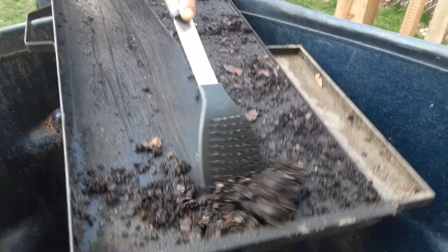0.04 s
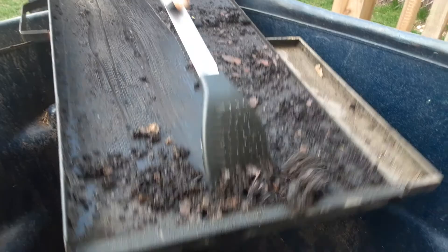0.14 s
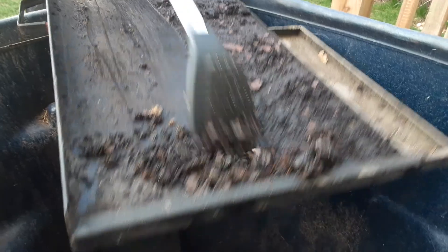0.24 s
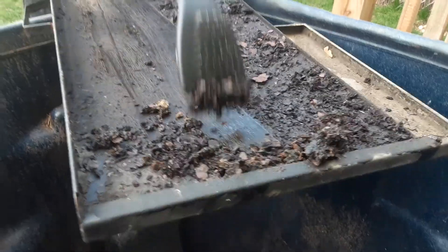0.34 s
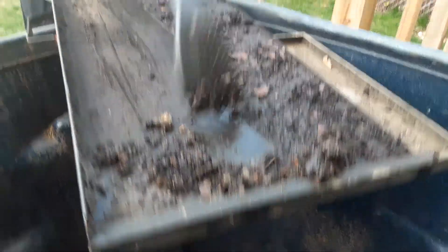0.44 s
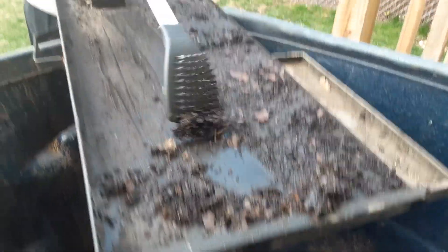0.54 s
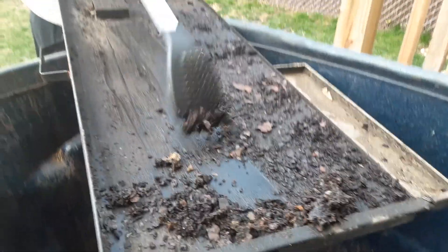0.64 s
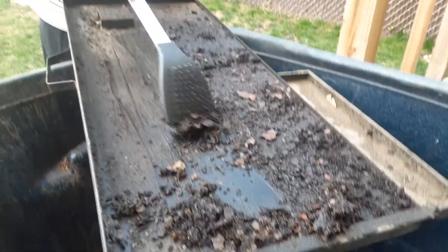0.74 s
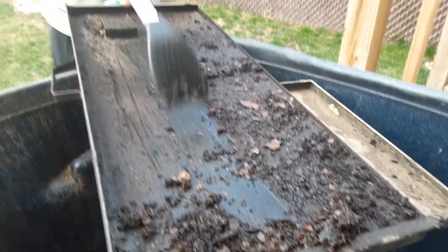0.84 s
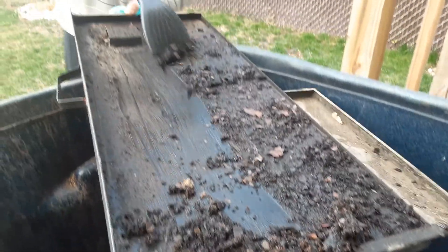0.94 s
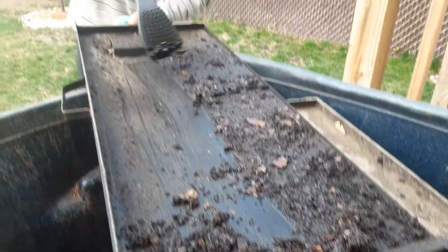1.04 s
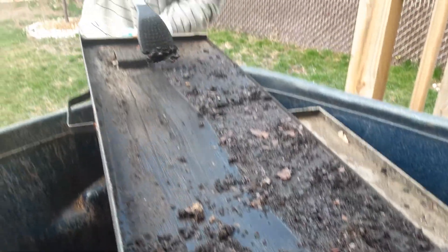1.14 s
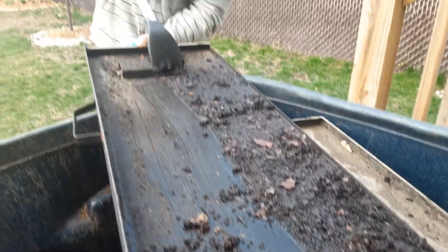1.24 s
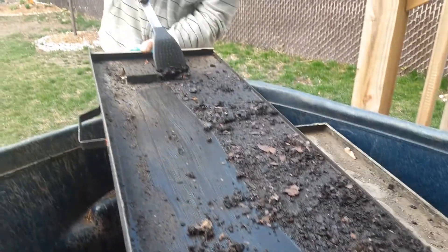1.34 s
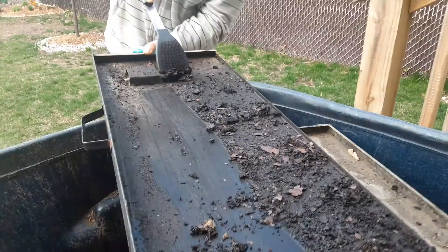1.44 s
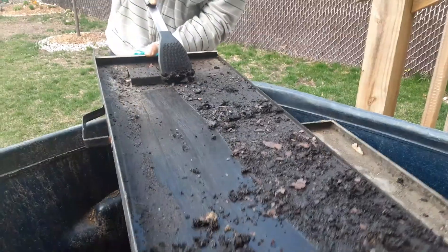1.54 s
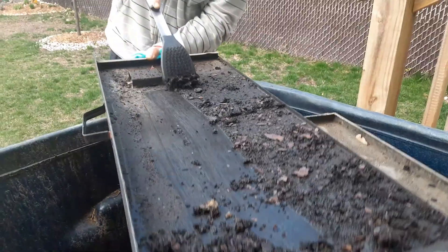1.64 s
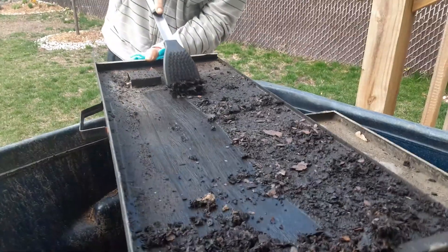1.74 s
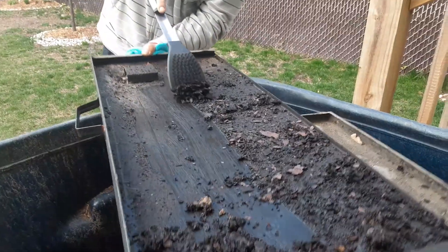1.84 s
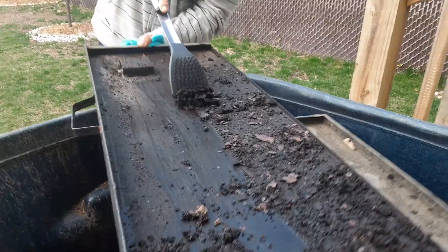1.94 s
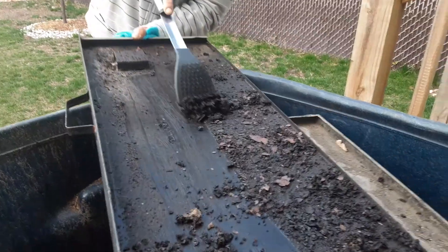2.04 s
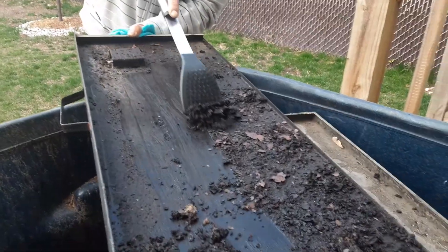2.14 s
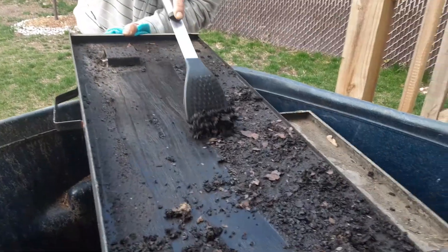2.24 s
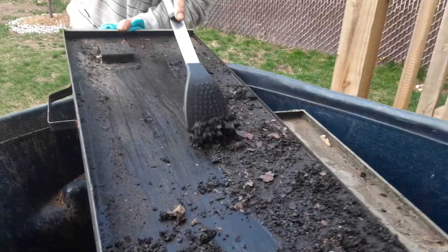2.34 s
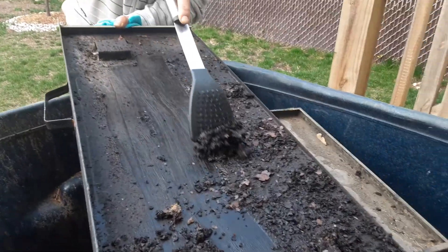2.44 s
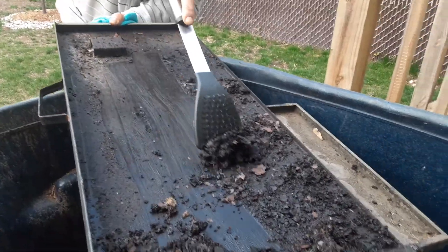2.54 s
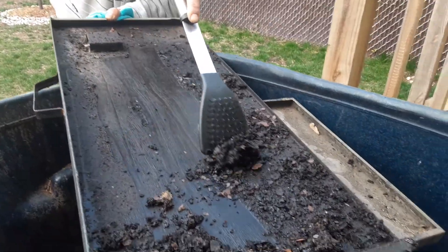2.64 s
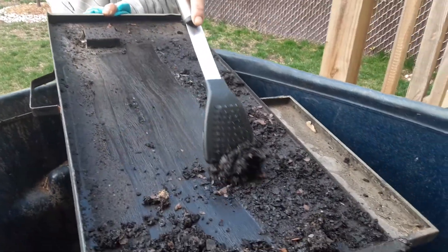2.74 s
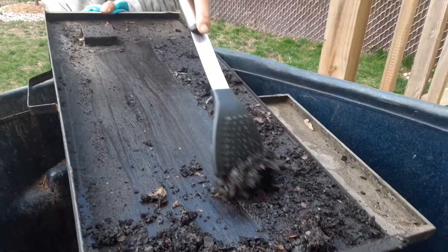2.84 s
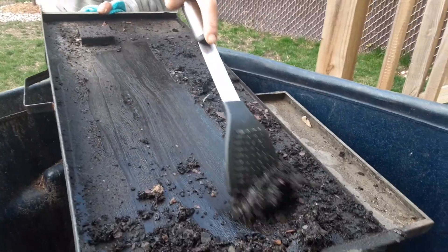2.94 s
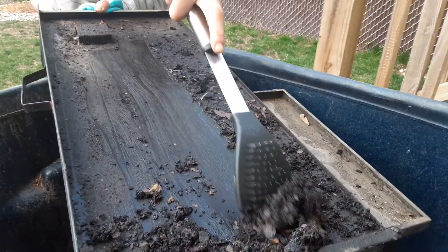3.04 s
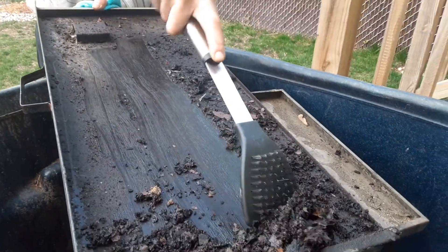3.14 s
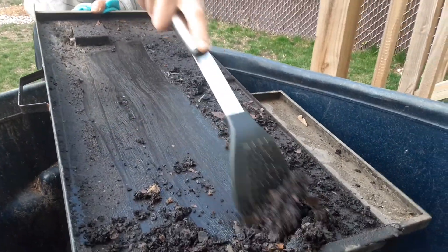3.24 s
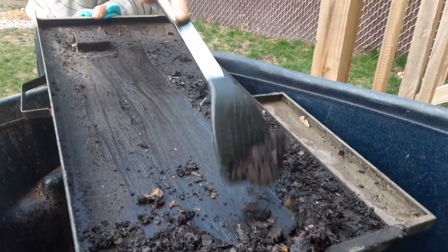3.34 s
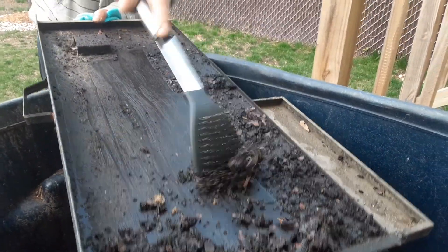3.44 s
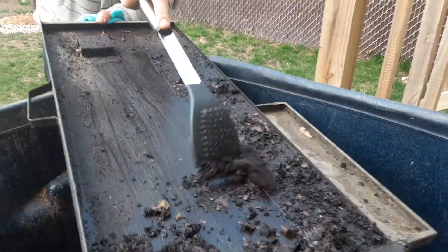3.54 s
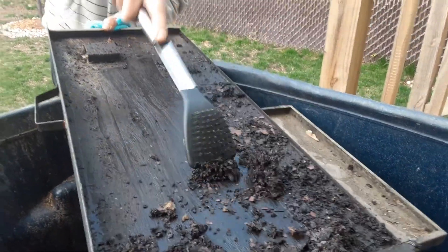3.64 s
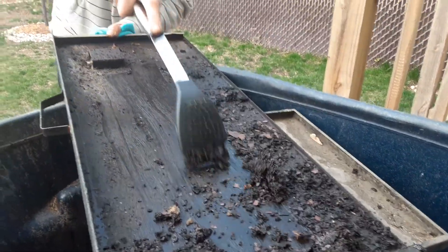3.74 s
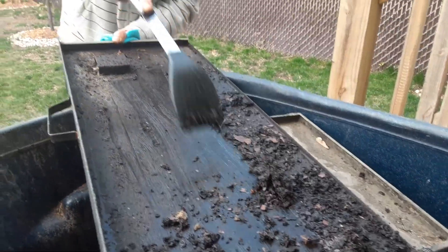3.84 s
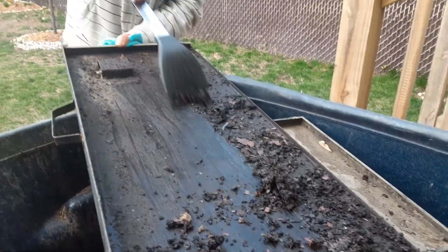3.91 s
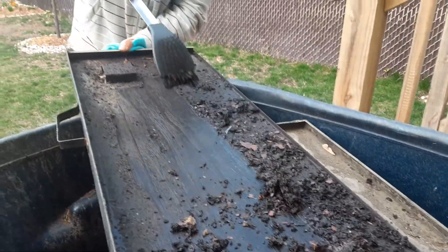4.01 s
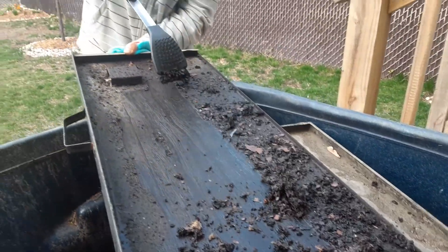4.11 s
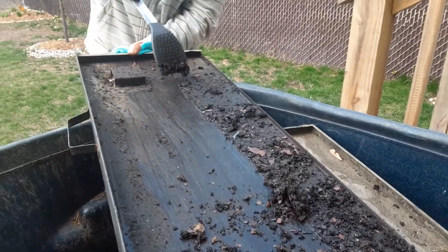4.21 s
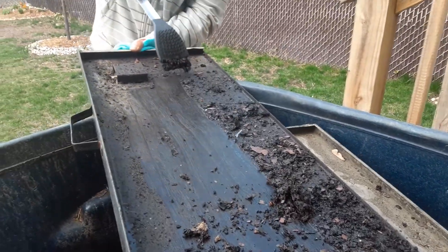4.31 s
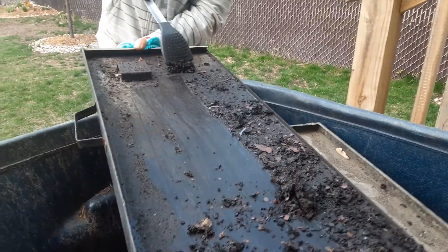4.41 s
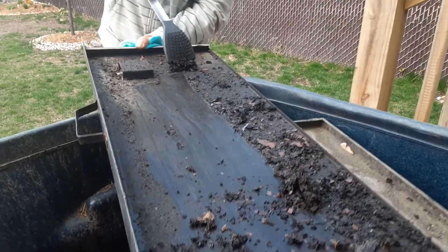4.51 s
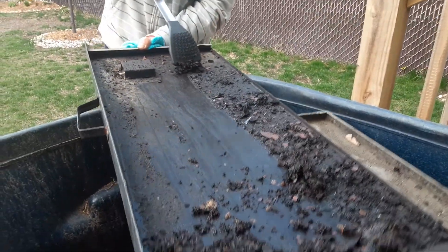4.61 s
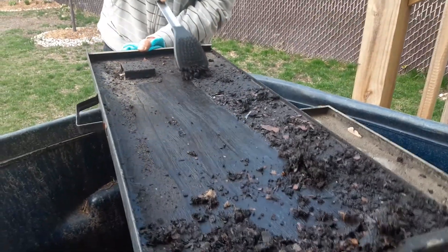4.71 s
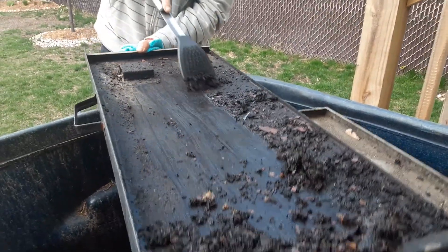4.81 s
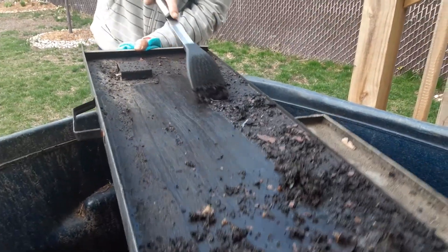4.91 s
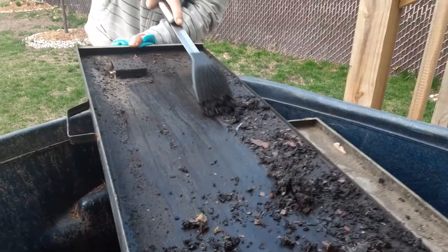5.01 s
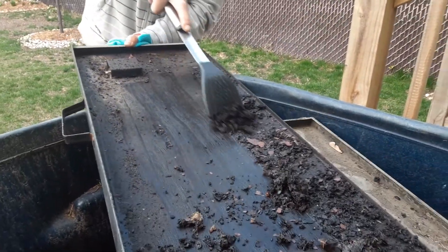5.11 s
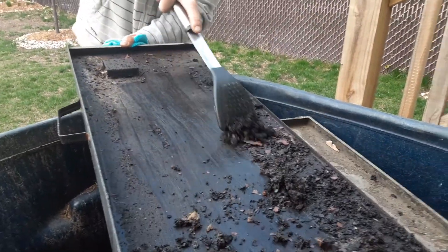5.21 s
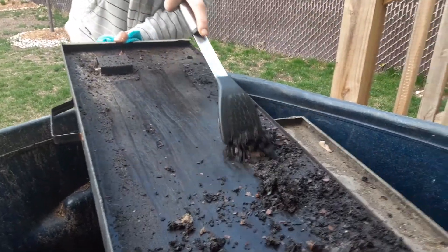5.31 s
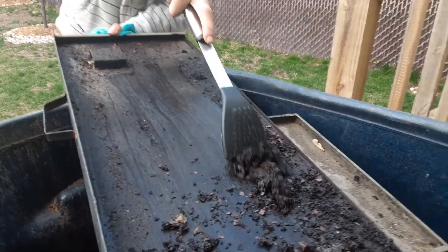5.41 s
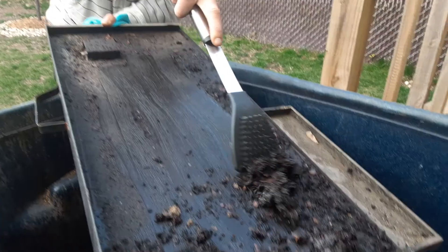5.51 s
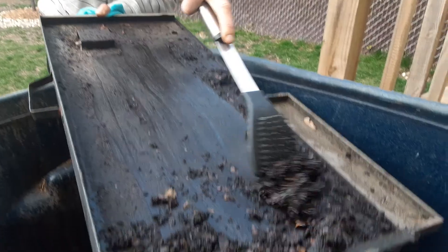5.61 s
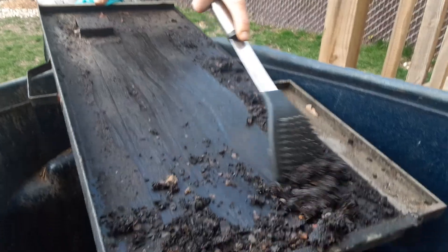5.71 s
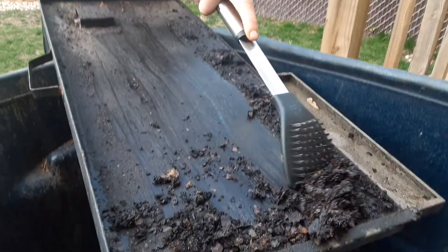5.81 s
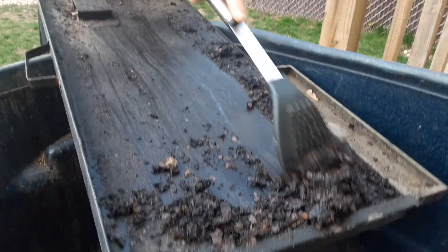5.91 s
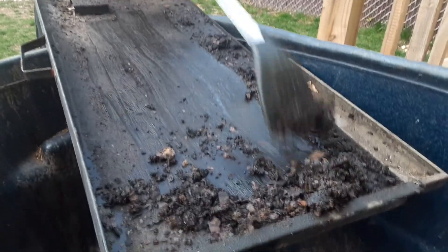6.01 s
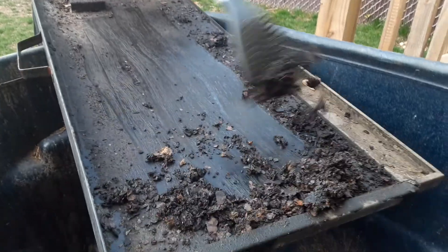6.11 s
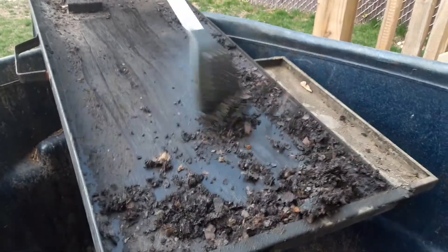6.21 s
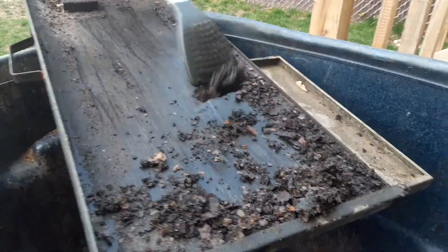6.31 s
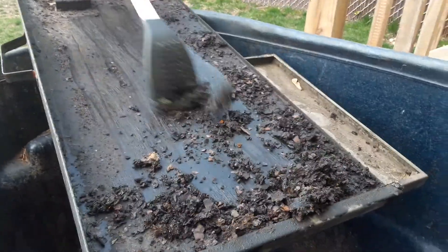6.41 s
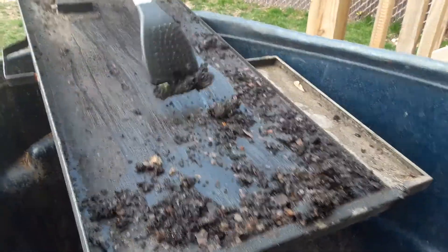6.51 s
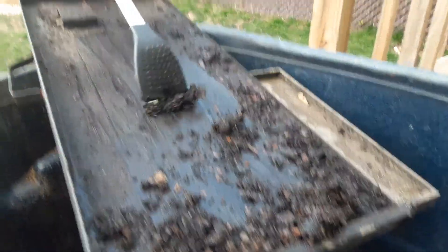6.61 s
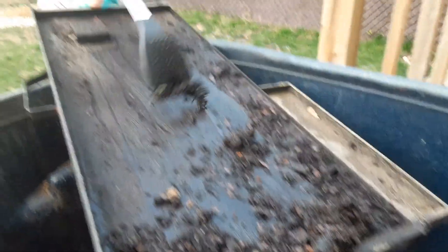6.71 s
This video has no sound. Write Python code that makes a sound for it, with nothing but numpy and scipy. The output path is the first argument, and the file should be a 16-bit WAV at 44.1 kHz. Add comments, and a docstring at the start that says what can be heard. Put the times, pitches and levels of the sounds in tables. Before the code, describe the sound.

A blade ploughs dry, crumbly grit along a resonant metal tray resting on a plastic bin. Short scrape, a pair of banging knocks, faint taps; long rasp with singing sheet notes, a heavy knock and a lighter one; another long, crunchier rasp with bright clicks; finally five quick hollow bangs with crumbs jumping. Quiet open air behind, very close microphone, muffled bin thud on the left, crisp grit on the right.

```python
"""Outdoors, over a steady hush of filtered noise, a scraper ploughs dry grease crumbs down a sheet-steel tray lying
across a plastic bin: granular noise through the tray's resonances, with sung tones and sharp ticks.
After this first short stroke come knocks on the tray (decaying noise, mode tones and a short push) and low puffs
on the right; then a long stroke, more knocks, another long stroke and a last run of knocks.
One hears it from two ports at the tray's end: left covered (dull, rich in bin thud), right open (bright, thin)."""
import sys
import numpy as np
from scipy import signal
from scipy.fft import rfft, irfft, next_fast_len
from scipy.io import wavfile
from scipy.ndimage import uniform_filter1d, map_coordinates

SR = 44100
rng = np.random.default_rng(int(sys.argv[2]) if len(sys.argv) > 2 else 0)


def transcribe(u):
    """Save the signal u as a 16-bit wav file named by the first command-line argument.

    u: samples, shape (n,) or (channels, n), limited to [-1, 1]; the rate is SR.
    q: integer samples, one column per channel.
    """
    v = np.clip(np.atleast_2d(u).T, -1, 1)
    q = np.round(v * 32767).astype(np.int16)
    wavfile.write(sys.argv[1], SR, q)


N = 298116

# Blade on tray, one curve a stroke:
# (time [s], pressure as tray rumble level [dB], speed as crumb crunch level [dB], bin thud level [dB])
STROKES = [
    [(0.0, -30.5, -39, -32), (0.02, -34, -42.5, -39), (0.048, -32.5, -39, -34), (0.142, -29.5, -41.5, -36),
     (0.168, -35, -50.5, -43), (0.192, -36.5, -42.5, -53), (0.23, -47, -51.5, -46)],
    [(1.47, -63, -77, -65), (1.52, -45.5, -51, -61), (1.64, -34, -36, -48), (1.66, -32, -37, -68),
     (1.676, -34, -36, -43.5), (2.37, -32.5, -37.5, -42), (2.572, -30, -36, -50), (2.682, -20, -32, -39),
     (2.796, -22.5, -35.5, -45), (2.858, -26.5, -38.5, -33), (2.92, -32, -39, -46),
     (3.008, -35, -36.5, -44), (3.034, -37, -39, -67), (3.07, -35, -40.5, -48),
     (3.142, -25.5, -37.5, -43.5), (3.288, -39.5, -56.5, -44), (3.33, -62, -73, -52)],
    [(4.53, -57, -66, -53), (4.568, -47, -53.5, -65), (4.6, -35, -42.5, -48), (4.718, -37.5, -37, -45),
     (4.878, -34.5, -36, -45), (4.928, -33.5, -37.5, -36), (4.972, -32, -38.5, -39.5),
     (5.074, -37, -32, -36), (5.284, -31, -35.5, -46), (5.328, -34, -35, -42.5), (5.486, -32, -33.5, -46),
     (5.518, -21, -27, -46), (5.582, -27.5, -31, -45), (5.834, -35.5, -42.5, -52), (5.862, -36, -48, -68),
     (5.898, -45.5, -60, -45), (5.95, -60, -63, -71)],
]
# Tray shifting between strokes and knocks:
# (time [s], tray rumble level [dB], crumb trickle level [dB], bin thud level [dB])
SETTLING = [
    [(0.24, -47, -54, -50), (0.248, -58, -66, -50), (0.27, -43, -47, -54), (0.332, -54, -57, -50),
     (0.384, -48, -55.5, -45), (0.43, -58, -66.5, -57), (0.48, -49, -50, -45)],
    [(3.72, -33, -51, -33), (3.77, -45, -49, -48), (3.826, -47.5, -62, -40), (3.864, -48.5, -61.5, -40),
     (3.966, -54.5, -62, -52), (4.012, -56, -61, -45), (4.1, -68, -72, -71)],
    [(5.95, -57, -76, -72), (6.074, -59, -69, -70), (6.08, -53.5, -65, -71), (6.142, -53, -59, -71),
     (6.158, -57, -59, -57), (6.168, -58, -71, -59), (6.18, -54, -60, -52)],
    [(0.82, -42, -70, -39), (0.886, -48, -49, -43), (0.91, -46, -59.5, -44), (1.0, -53.5, -60, -42)],
    [(1.1, -51, -57, -41), (1.162, -62, -63, -61), (1.18, -57, -62.5, -48), (1.28, -62, -61.5, -62)],
    [(1.37, -52, -59, -50), (1.392, -54, -61, -50), (1.404, -51, -61, -49), (1.47, -68, -78, -57)],
    [(3.33, -58, -66, -58), (3.338, -55, -69, -46), (3.388, -53, -58, -47), (3.46, -50, -56, -47)],
    [(4.25, -68, -78, -70), (4.316, -70, -64, -71), (4.334, -74, -61.5, -60), (4.4, -68, -68, -69)],
    [(4.47, -56, -63.5, -54), (4.516, -57, -62, -55), (4.52, -68, -67, -49), (4.53, -58, -65, -55)],
]
# Stick-slip notes of the sheet: (time [s], length [s], frequency [Hz], level [dB])
SUNG_NOTES = [(0.115, 0.053, 227.3, -30), (2.504, 0.072, 222, -30.5), (2.662, 0.061, 490, -26),
              (2.715, 0.17, 545, -27), (2.79, 0.075, 482, -27.5), (3.096, 0.1, 770, -35.5),
              (3.134, 0.038, 222, -34.5), (3.202, 0.019, 222, -31.5), (4.959, 0.064, 317.4, -36),
              (5.028, 0.024, 202, -36), (5.463, 0.044, 657, -35), (5.506, .11, 500, -34),
              (5.784, 0.037, 480, -36)]
# Single sharp contacts of blade and hard crumbs: (time [s], level [dB])
TICKS = [(0.1755, -49), (0.195, -47), (0.369, -45), (0.458, -46), (0.4713, -45.5), (0.61, -47),
         (0.6394, -43.5), (0.7117, -33), (0.8616, -48), (1.1, -50), (1.4825, -52), (2.507, -30),
         (2.9473, -27), (3.2664, -43.5), (3.685, -35), (3.7294, -48.5), (3.7894, -51.5), (3.9449, -63),
         (3.9932, -39.5), (4.2607, -58), (4.413, -48), (4.5555, -49.5), (4.5935, -42), (4.619, -29.5),
         (5.3593, -23), (5.651, -22), (5.494, -25.5), (5.7284, -32), (6.0804, -48), (6.3967, -36.5),
         (6.5837, -22.5)]
# Knocks: (time [s], tray level [dB], edge re tray [dB], crumbs re tray [dB], bin re tray [dB], rattle hold [s],
# tray decay by 60 dB [s], build-up of airborne sound at the open port [s], lean to the lower hollow note [dB])
KNOCKS = [(0.261, -44.5, 11, -9.5, -26, .018, .16, 0.016, -2),
          (0.5034, -16.5, -10, -7.5, -11, 0.012, 0.51, 0.0077, 9.5),
          (0.707, -18, -11.5, -11.5, -3, 0.0092, .42, 0.0089, 7),
          (1.018, -37.5, 3, -8, -3, 0.014, 0.27, 0.0085, 7),
          (1.295, -39, -12.5, -12, 1, 0.028, 0.29, 0.019, 5.5),
          (3.483, -12.5, -10, -13, -33, 0.032, 0.49, 0.023, 1.5),
          (3.683, -26, -9.5, -16.5, -2.5, .02, 0.39, 0.00077, 10),
          (4.416, -42, -7, -16.5, 0, 0.012, 0.27, 0.014, -1),
          (6.204, -14, -8, -10.5, -13, 0.035, 0.51, 0.015, -3),
          (6.287, -20.5, -25, -15, -23, 0.014, .26, 0.0022, -8),
          (6.398, -14.5, -9, -12.5, -8, 0.047, 0.45, 0.022, 1),
          (6.484, -26.5, -9, -18, -28, .03, .5, .001, -8),
          (6.584, -19, -7, -12, -8, 0.013, 0.4, 0.00073, -6)]
# Brief low puffs, strongest at the open port: (time [s], level [dB])
PUFFS = [(0.374, -31.5), (1.244, -49), (3.307, -37), (3.439, -50)]

# Resonances of the tray on the bin: (frequency [Hz], width [Hz], rise [dB])
TRAY_MODES = [(84.93, 57, 10.5), (148.4, 27, 12), (217.6, 43, 13.5), (309.4, 5.9, 13), (395, 14, 3),
              (458.6, 16, 9), (544, 5.7, 5.5), (584, 9.3, 1), (643, 65, 5.5), (730, 7.6, 7), (807, 18, 6.5),
              (918, 5.8, 8), (996, 19, 10.5), (1083, 13, 6), (1255, 55, 7), (1460, 13, 5), (1674, 15, 11.5)]

# Relative spectral densities, each scaled to its source's level: (frequency [Hz], density [dB])
AIR_COLOUR = [(18, -31), (30, -8), (157, -0.5), (394, -9), (499, -10), (616, -16), (844, -17.5),
              (2230, -31), (2750, -28.5), (9710, -47.5), (16000, -36)]
RUMBLE_COLOUR = [(150, -35.5), (250, -9), (404, -4.5), (477, -2.5), (581, -4), (771, -3.5), (1050, -6.5),
                 (1130, -7.5), (2600, -30.5), (3380, -54), (5720, -120)]
CRUNCH_COLOUR = [(880, -20.5), (1500, -4), (1770, -3.5), (2060, -9), (2970, -6), (3390, -8), (4990, -7),
                 (5990, -12), (6800, -15.5), (8840, -51.5), (15000, -120)]
DUST_COLOUR = [(4000, -30.5), (6800, -2), (7380, -3), (9620, -6.5), (11000, -1.5), (12400, -2.5),
               (15100, -7.5), (16000, -13)]
THUD_COLOUR = [(15, -64), (25, -43), (70, -5), (87, -3.5), (114, -8.5), (200, -15.5), (260, -14),
               (440, -120)]
GROAN_COLOUR = [(130, -31.5), (180, 3), (215, 14), (260, 4), (350, -33.5)]
SNAP_COLOUR = [(880, -20), (1500, 0.5), (2190, -11), (4200, -5), (6060, -4.5), (9650, -9.5), (12500, -3),
               (16000, -7.5)]
BANG_COLOUR = [(82, -27), (140, -13.5), (312, -3), (373, 1.5), (567, 4), (992, -8.5), (1140, -17.5),
               (1300, -15.5), (1690, -59), (2860, -120)]
EDGE_COLOUR = [(590, -12.5), (1000, 3.5), (1380, 2), (1580, 3), (2090, -5.5), (3600, -8.5), (4000, -11),
               (5200, -37), (8800, -120)]
JUMP_COLOUR = [(1290, -3), (2200, -6), (2680, -6.5), (2930, -1.5), (4820, -4.5), (5240, -3), (6800, -18),
               (8840, -26.5), (15000, -120)]
RING_COLOUR = [(60, -9), (90, -3), (150, -11.5), (230, -3), (320, 2), (500, -2), (800, -11.5),
               (1300, -22.5), (2000, -22.5)]
BOOM_COLOUR = [(15, -44), (25, -59), (38, -51), (70, 20.5), (162, 9), (200, -0.5), (260, 0), (440, -120)]
BLOW_COLOUR = [(60, -40), (150, -14), (350, -2), (700, 0), (1500, -6), (3000, -14), (8000, -30),
               (16000, -40)]
PUFF_COLOUR = [(100, -39), (220, -1), (350, 8), (520, -9), (900, -40)]

# Left port over right port, for far air, rubbing and blows: (frequency [Hz], level difference [dB])
PORTS_AIR = [(60, 14.5), (110, 15.5), (200, 10.0), (380, 2.5), (700, 0.0), (1290, -0.5), (2380, -4.5),
             (4400, -10.5), (8120, -8.0), (15000, -3.5)]
PORTS = [(60, 12.5), (190, 7), (460, 1), (1100, 4.5), (2620, -5.5), (4690, -19.5), (8390, -31),
         (11200, -15), (15000, -21)]
PORTS_BLOW = [(60, 10.5), (190, 15.5), (460, 1), (1100, 5), (2620, -5), (4690, -15.5), (8390, -30),
              (11200, -13.5), (15000, -16)]
# Left-right likeness, for rubbing and blows: (frequency [Hz], correlation [0 to 1])
ALIKE = [(60, 0.31), (160, 0.69), (300, 0.81), (500, 1), (1000, 0.86), (1500, 0.083), (4000, 0.033)]
ALIKE_BLOW = [(60, 0.44), (200, 0.77), (500, 1), (1000, 0.85), (1500, 0.23), (4000, 0.042)]

AIR_DB = -52.5
LEFT_LAG_S = 0.000046
TOP_HZ = 15750
FADE_S = 0.045  # contact comes and goes this fast
USUAL_PRESSURE_DB, USUAL_SPEED_DB = -34, -38  # a usual stroke, as rumble and crunch levels
DUST_DB, DUST_FOLLOWS = -3, 1.024  # re crunch at usual speed; dB for each dB of crunch
DUST_CHOKES = 0.16  # dB lost for each dB of pressure over the usual
GROAN_DB, GROAN_FOLLOWS = -45, 0.76  # at the usual pressure; dB for each dB of pressure
SING_EDGE_S, SING_WAVER_HZ = 0.0097, 7.92
TICK_T60_S, PUFF_T60_S, CRUMB_T60_S = 0.047, 0.053, 0.25  # decay by 60 dB
HOLLOW_DB = -10.5  # two deep bending notes of the sheet, re tray, before the lean


def amp(db):
    """Level: gain is ten to the power of decibels over twenty."""
    return 10 ** (np.asarray(db) / 20)


def unit(x):
    """Normalization: a signal divided by its rms has rms 1."""
    return x / np.sqrt(np.mean(x ** 2) + 1e-20)


def along(points, hz):
    """Logarithmic frequency: values are interpolated evenly along a log axis."""
    f, v = np.transpose(points)
    return np.interp(np.log(hz + 1), np.log(f + 1), v)


def wobble(rate):
    """Slow fluctuation: a smooth curve through random knots, rate knots a second."""
    knots = rng.standard_normal(int(N * rate / SR) + 4)
    return map_coordinates(knots, [np.arange(N) * rate / SR])


def grit(rate, spread_db, share, patchy_db, life=0.0045):
    """Granular excitation: two noise forces, patchy in pitch and time, swell with each crumb that breaks."""
    spectra = signal.stft(rng.standard_normal((2, N)), nperseg=512)[2]
    field = rng.standard_normal(spectra.shape[1:])
    for axis in (0, 1):
        field = uniform_filter1d(field, size=3, axis=axis)
    noise = signal.istft(spectra * amp(patchy_db * unit(field)), nperseg=512)[1][:, :N]
    breaks = rng.random(N) < rate / SR
    crumbs = breaks * amp(spread_db * (2 * rng.random(N) - 1))
    decay = np.exp(-np.arange(SR // 50) / (life * SR))
    crumbs = unit(signal.fftconvolve(crumbs, decay)[:N])
    return unit(noise) * np.sqrt(1 - share + share * crumbs ** 2)


def heard(level, force, colour, ports, alike, ringing=True):
    """Minimum-phase filtering: forces pass a causal colour to two partly correlated ports.

    The level is one row or one per port; for noise of rms 1 it is the rms of the two ports' mean."""
    k, m = 2 ** 15, next_fast_len(N + 2 ** 15)
    hz, fine_hz = np.fft.rfftfreq(k, 1 / SR), np.fft.rfftfreq(m, 1 / SR)
    gain = amp(np.maximum(along(colour, hz), -90))
    if ringing:
        modes = sum((amp(db) ** 2 - 1) / (1 + (2 * (hz - c) / w) ** 2) for c, w, db in TRAY_MODES)
        gain = gain * np.sqrt(1 + modes.clip(-.9))
    lean = amp(along(ports, hz))
    likeness = np.clip(along(alike, hz), 0, 1)
    centre_power = 1 + lean ** 2 + 2 * likeness * lean
    right = 2 * gain / np.sqrt(np.mean(gain ** 2) * centre_power)
    # folding the cepstrum onto positive times makes the response causal
    cepstrum = irfft(np.log([right * lean, right]), k)
    cepstrum[:, 1:k // 2] *= 2
    cepstrum[:, k // 2:] = 0
    response = rfft(irfft(np.exp(rfft(cepstrum)), k), m)
    at_left, at_right = np.broadcast_to(level, (2, N))
    own, shared, other = rfft([at_left * force[0], at_right * force[0], at_right * force[1]], m)
    like = np.clip(along(alike, fine_hz), 0, 1)
    late = np.exp(-2j * np.pi * fine_hz * LEFT_LAG_S)  # the covered port hears last
    at_ports = [own * late, like * shared + np.sqrt(1 - like ** 2) * other]
    return irfft(response * at_ports, m)[:, :N]


def bursts(s, db, rise, hold, t60):
    """Exponential decay: events rise, hold and die away, and their powers add."""
    power, t = np.zeros(N + SR), np.arange(SR) / SR
    for at, level, up, stay, life in np.broadcast(s, db, rise, hold, t60):
        fall = amp(level - 60 * np.maximum(t - stay, 0) / life)
        power[round(at * SR):][:SR] += (fall * (1 - np.exp(-(t / up) ** 2))) ** 2
    return np.sqrt(power[:N])


def air():
    """Stationary noise: the outdoor hush keeps one level and spectrum, less alike at the ports in the treble."""
    alike = [(60, .1), (400, 1.0), (1500, 0.036)]
    return heard(amp(AIR_DB), rng.standard_normal((2, N)), AIR_COLOUR, PORTS_AIR, alike, ringing=False)


def contact(stretches):
    """Superposition: gains for each level column add, each stretch fading in before and out after its rows."""
    t, total = np.arange(N) / SR, 1e-6
    for rows in stretches:
        s, *cols = np.transpose(rows)
        fade = np.interp(t, [s[0] - FADE_S, s[0], s[-1], s[-1] + FADE_S], [0, 1, 1, 0])
        total = total + fade * amp([np.interp(t, s, c) for c in cols])
    return total


def rubbing(pressure_db, speed_db, thud_db):
    """Frictional excitation: a juddering blade crushes crumbs, and sheet and bin rumble, groan and thud."""
    judder = wobble(70)  # the blade's grip comes and goes
    crust = grit(rate=400, spread_db=4, share=.12, patchy_db=1)
    crumbs = grit(rate=900, spread_db=7, share=.3, patchy_db=2.4, life=.001)
    over_db = pressure_db - USUAL_PRESSURE_DB
    dust_db = USUAL_SPEED_DB + DUST_DB + DUST_FOLLOWS * (speed_db - USUAL_SPEED_DB)
    dust_db = dust_db - DUST_CHOKES * np.maximum(over_db, 0)
    groan_db = GROAN_DB + GROAN_FOLLOWS * over_db + 4 * wobble(20)
    rumble_gain = amp(pressure_db + 1.35 * judder + 0.34 * wobble(15))
    crunch_gain = amp(speed_db + 0.76 * judder + 0.41 * wobble(25))
    dust_gain = amp(dust_db + 0.92 * judder + 1.07 * wobble(18))
    thud_gain = amp(thud_db + 2.3 * wobble(12))
    rumble = heard(rumble_gain, crust, RUMBLE_COLOUR, PORTS, ALIKE)
    crunch = heard(crunch_gain, crumbs, CRUNCH_COLOUR, PORTS, ALIKE, ringing=False)
    dust = heard(dust_gain, crumbs, DUST_COLOUR, PORTS, ALIKE, ringing=False)
    thud = heard(thud_gain, rng.standard_normal((2, N)), THUD_COLOUR, PORTS, ALIKE)
    groan = heard(amp(groan_db), crust, GROAN_COLOUR, PORTS_BLOW, ALIKE_BLOW, ringing=False)
    return rumble + crunch + dust + thud + groan


def scraping():
    """Sliding contact: strokes sound, and between them the tray shifts on the rim while loose crumbs trickle."""
    pressure_db, speed_db, thud_db = 20 * np.log10(contact(STROKES + SETTLING))
    return rubbing(pressure_db, speed_db, thud_db)


def singing():
    """Stick-slip: the blade on bare steel makes the sheet sing single notes that swell, waver and fade."""
    t, out = np.arange(N) / SR, np.zeros((2, N))
    waver = 2 * np.pi * np.cumsum(SING_WAVER_HZ * wobble(40)) / SR
    shimmer = amp(1.3 * wobble(60))
    for s, length, hz, db in SUNG_NOTES:
        swell = np.interp(t, [s - SING_EDGE_S, s, s + length, s + length + SING_EDGE_S], [0, 1, 1, 0])
        note = amp(db) * swell * np.sin(2 * np.pi * hz * t + waver)
        lean = amp(along(PORTS_BLOW, hz))
        out += np.outer([lean, 1], np.sqrt(8) / (1 + lean) * note)
    return out * shimmer


def ticks():
    """Short impact: a sharp contact gives a bright snap of quickly decaying noise."""
    level = bursts(*np.transpose(TICKS), 0.00055, 0, TICK_T60_S)
    return heard(level, rng.standard_normal((2, N)), SNAP_COLOUR, PORTS, ALIKE, ringing=False)


def tones(drift_db):
    """Modal vibration: tones at the tray's mode pitches swell and fade as the contact point moves."""
    t = np.arange(N) / SR
    phases = 2 * np.pi * rng.random((len(TRAY_MODES), 2, 1))
    total = 0
    for (hz, _, db), phase in zip(TRAY_MODES, phases):
        total = total + amp(db + drift_db * wobble(6)) * np.sin(2 * np.pi * hz * t + phase)
    return unit(total)


def knocks():
    """Structure-borne and airborne paths: a blow reaches the covered port at once through the bin, and builds up
    more slowly in the air; the loose tray rattles on the rim, crumbs jump and patter back."""
    s, db, edge_db, crumb_db, bin_db, hold, t60, build, lower_db = np.transpose(KNOCKS)

    def struck(level_db, rise, stay, life, force, colour, ringing=False):
        """Path difference: the open port's sound rises later than the covered port's."""
        left = bursts(s, level_db, rise, stay, life)
        right = bursts(s, level_db, rise + build, stay, life)
        return heard([left, right], force, colour, PORTS_BLOW, ALIKE_BLOW, ringing)

    rattle = grit(rate=400, spread_db=3, share=.12, patchy_db=.8)
    patter = grit(rate=300, spread_db=5, share=.25, patchy_db=2.2)
    bang = struck(db, 0.0015, hold, t60, rattle, BANG_COLOUR, ringing=True)
    edge = struck(db + edge_db, 0.00045, 0.079 * hold, 0.71 * t60, rattle, EDGE_COLOUR)
    jump = struck(db + crumb_db, 0.00024, 0.5 * hold, CRUMB_T60_S, patter, JUMP_COLOUR)
    dust = struck(db + crumb_db - 6.0, 0.00025, 0.46 * hold, 0.93 * CRUMB_T60_S, patter, DUST_COLOUR)
    ring = struck(db - 18, 0.003, 0.41 * hold, 1.15 * t60, tones(drift_db=2), RING_COLOUR)
    boom = struck(db + bin_db, 0.00079, 0.44 * hold, 1.3 * t60, rattle, BOOM_COLOUR, ringing=True)
    # the first contact is one short push, which sets every mode of the tray ringing together
    blow = struck(db + 10, .0001, 0, .0016, np.ones((2, N)), BLOW_COLOUR, ringing=True)
    t, hollow = np.arange(N) / SR, 0
    for (hz, _, _), lean_db in zip(TRAY_MODES[2:4], [lower_db, -lower_db]):
        note = np.sqrt(2) * np.sin(2 * np.pi * hz * t + 1.0 * wobble(25))
        hollow = hollow + struck(db + HOLLOW_DB + lean_db, .003, 1.1 * hold, 0.59 * t60, [note] * 2, [(hz, 0)])
    return hollow + bang + ring + edge + jump + dust + boom + blow


def puffs():
    """Low-frequency transient: a short burst of band noise, 14 dB weaker at the covered left port."""
    level = bursts(*np.transpose(PUFFS), 0.001, 0, PUFF_T60_S)
    return heard(level, rng.standard_normal((2, N)), PUFF_COLOUR, [(350, -14)], [(350, 0.11)], ringing=False)


def scene():
    """Superposition: the pressures of all sources add at the two ports."""
    return air() + scraping() + singing() + ticks() + knocks() + puffs()


def record(dry):
    """Saturation and band limit: loud peaks round off at full scale, then nothing is kept above TOP_HZ."""
    x = dry / (1 + np.abs(dry) ** 8) ** (1 / 8)
    m = next_fast_len(N + 4096)
    passed = np.fft.rfftfreq(m, 1 / SR) < TOP_HZ
    return irfft(rfft(x, m) * passed, m)[:, :N]


dry = scene()
out = record(dry)
transcribe(out)
```